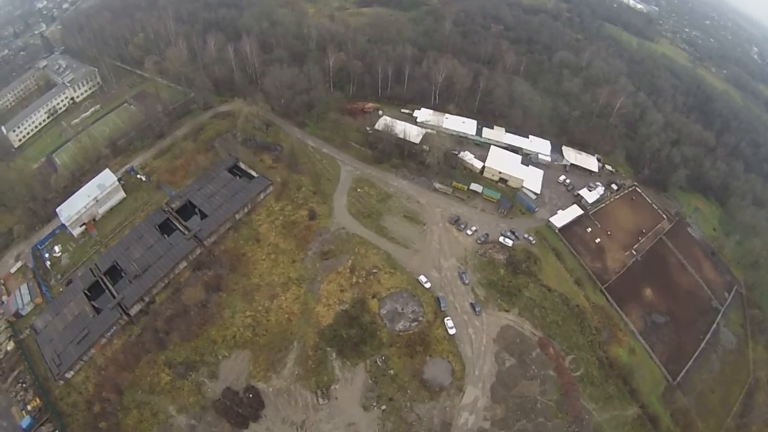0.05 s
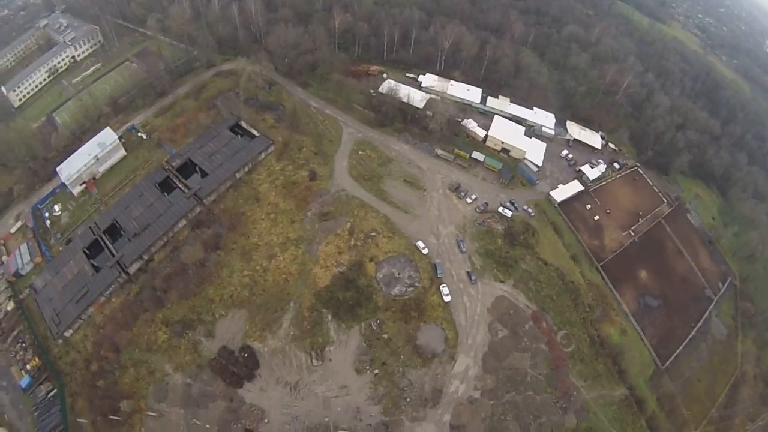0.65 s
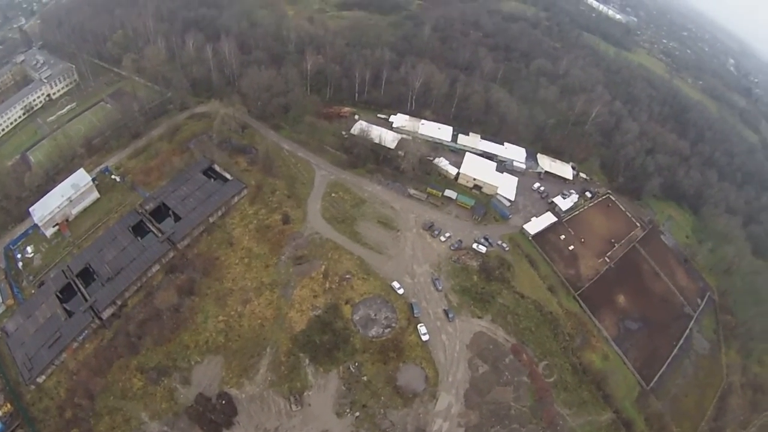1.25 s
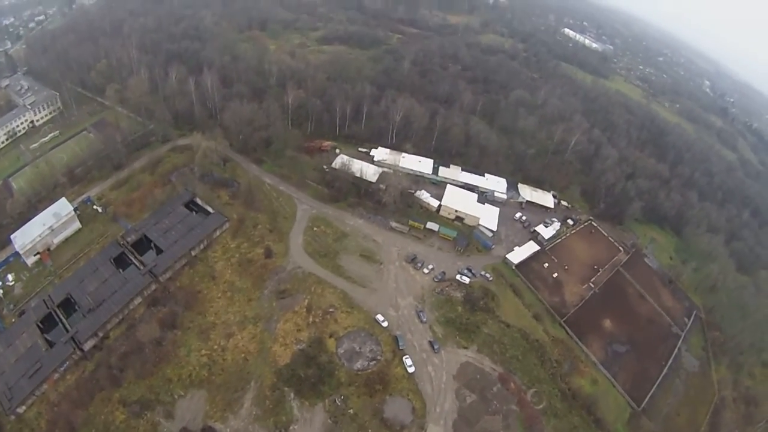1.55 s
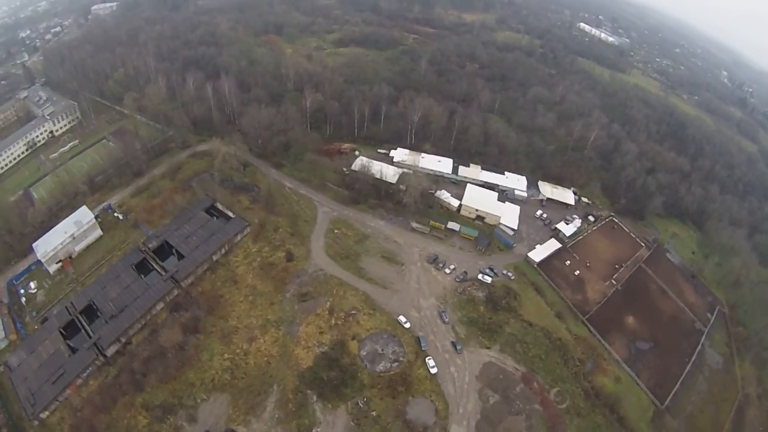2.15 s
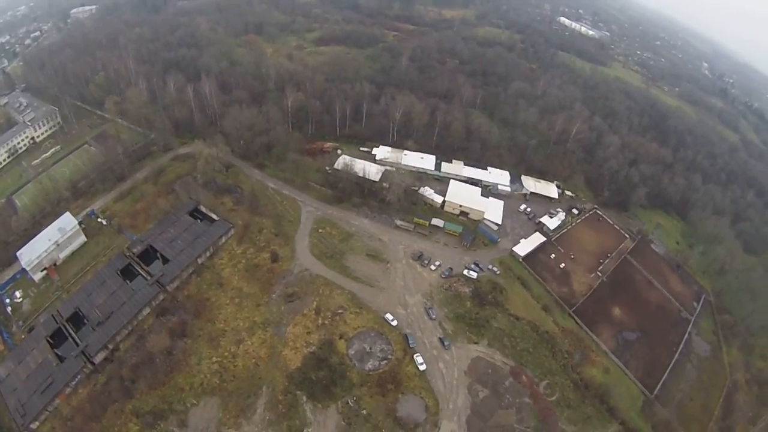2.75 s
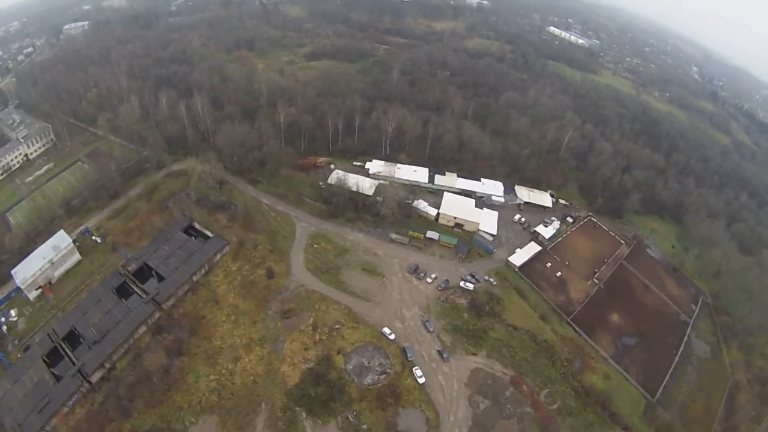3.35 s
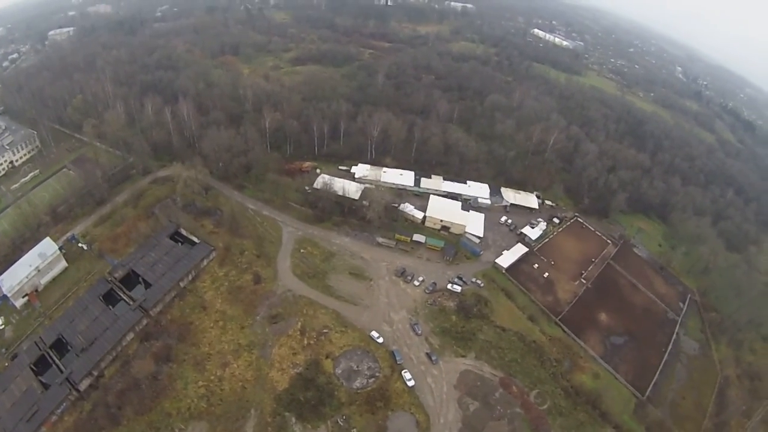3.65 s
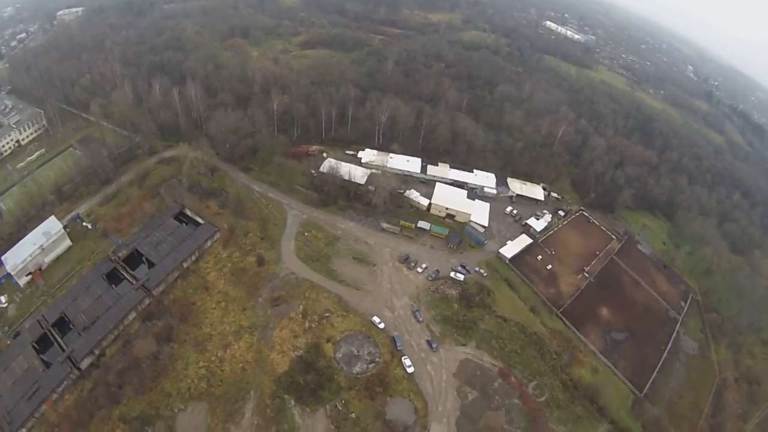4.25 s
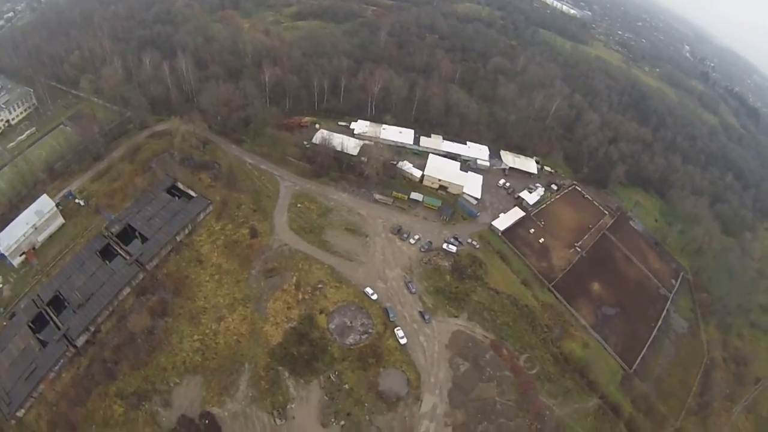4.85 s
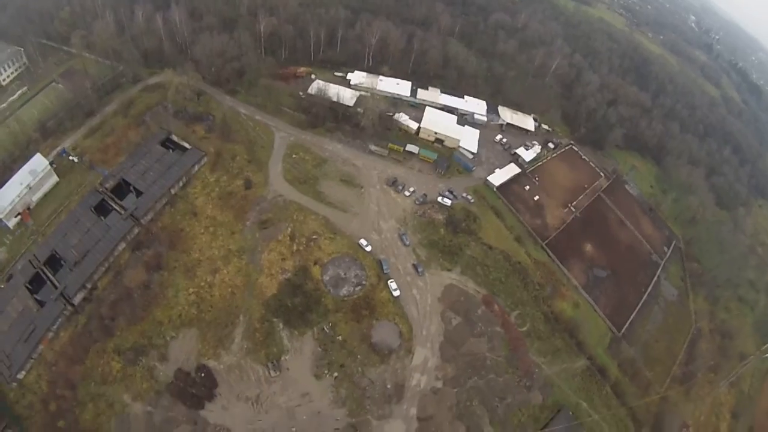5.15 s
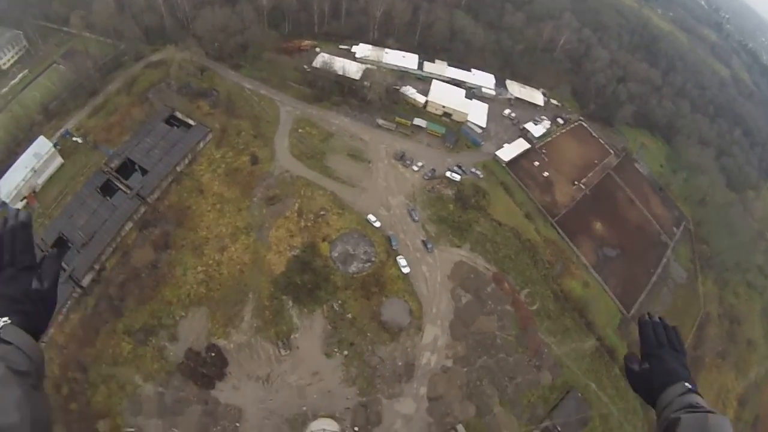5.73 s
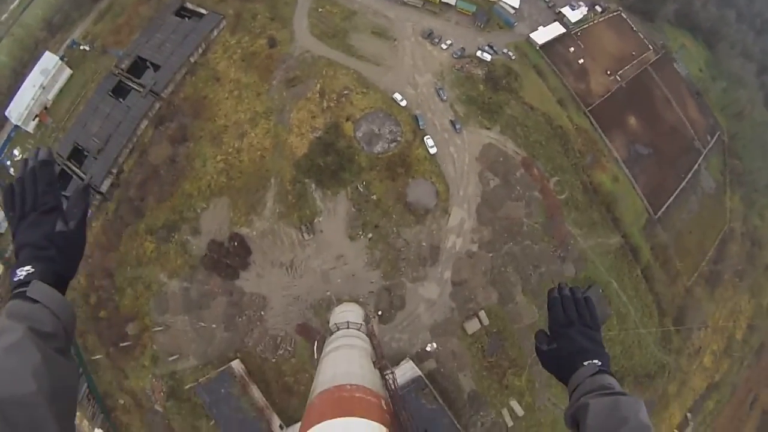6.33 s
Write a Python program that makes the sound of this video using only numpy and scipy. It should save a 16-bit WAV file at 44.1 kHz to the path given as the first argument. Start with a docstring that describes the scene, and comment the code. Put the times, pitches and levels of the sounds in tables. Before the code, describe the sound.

A rope jumper's fall is heard close up from a body-worn camera outdoors. For the first two seconds it is very quiet: faint hiss and a soft, hollow hum of air around the housing. From about 2 to 3.5 seconds small harness parts tick lightly, with a sharper click at 2.6. Meanwhile the wind grows steadily, with spells of low thumping, and is loud by 4.3 seconds, when a faint, thin whistle sounds briefly. The rush peaks with heavy buffeting between 5 and 5.3 seconds. At about 5.35 gear knocks hard on the plastic housing, the sound ducks for a moment and the wind drops away. It surges back around 5.7, then sinks and flutters unevenly over a low rumble. From 6.25 to 6.45 seconds a last gust comes with a quick cluster of sharp knocks, the hardest briefly pushing everything down again.

```python
"""A rope jumper falls from a tall chimney with a camera worn on the body.
At first slow air draws soft, hollow tones from the camera's housing. As the fall speeds up,
small gear ticks, and the air rushes ever louder, thumps in spells and whistles faintly.
Near the end the rope takes the load: the wind drops out and surges back, gear knocks
hard on the housing, and the camera's limiter briefly turns everything down."""
import sys
import numpy as np
from scipy import signal
from scipy.fft import rfft, irfft
from scipy.io import wavfile
from scipy.ndimage import uniform_filter1d, minimum_filter1d

SR = 44100
rng = np.random.default_rng(int(sys.argv[2]) if len(sys.argv) > 2 else 0)


def waveform_to_disk(signal):
    """Save audio, clipped to [-1, 1], as 16-bit WAV at the path in sys.argv[1]."""
    frames = np.transpose(np.atleast_2d(signal))
    scaled = np.clip(frames, -1, 1) * 32767
    samples = np.round(scaled).astype(np.int16)
    wavfile.write(sys.argv[1], SR, samples)


N = 286209
TIME = np.arange(N) / SR
FREQ = np.maximum(np.arange(N // 2 + 1) * SR / N, 1)

# Hollow tones of the housing. Each row: pitch in Hz, width in Hz, level in dB at a rush of 0 dB.
HOLLOW_TONES = [(560.5, 67, -28.5), (1626, 100, -21)]
# Small harness parts touching. Each row: start in seconds, peak in dB.
HARNESS_TICKS = [(2.0183, -42), (2.0232, -38), (2.0562, -47), (2.117, -45.5), (2.6032, -30), (2.6824, -37),
                 (2.6912, -35.5), (2.7420, -31.5), (2.7852, -31), (2.9592, -42), (2.9936, -40),
                 (3.0307, -37), (3.0868, -42), (3.1225, -42), (3.1622, -41), (3.2620, -31), (3.2845, -33.5),
                 (3.3317, -39), (3.4670, -34), (3.5294, -30)]
# How those parts ring. Each row: pitch in Hz, relative level in dB, seconds to fade by 60 dB.
HARNESS_TONES = [(6330, 1, 0.0061), (6800, -7, 0.0058), (7650, -4.5, 0.0022), (9400, -8, .002)]
# Air whistles. Each row: start and length in seconds, first and last pitch in Hz, level in dB.
EDGE_WHISTLES = [(2.80, 0.077, 3940, 4330, -58), (3.04, 0.039, 4560, 4300, -56),
                 (3.12, 0.034, 4550, 4140, -58), (4.26, 0.35, 4050, 4160, -36.5)]
# Gear hitting the housing. Each row: start in seconds, peak in dB, treble limit in Hz, scrape time in ms.
GEAR_KNOCKS = [(0.402, -50, 4500, 1.3), (0.6467, -46.5, 8000, 0.69), (2.0262, -30, 1390, 0.091),
               (2.6044, -15, 4500, 0.61), (5.109, -10, 1260, 0.69), (5.3232, -12, 9000, 1.05),
               (5.3534, 23, 2940, .05), (5.4109, -6, 13000, 1.3), (5.413, -23.5, 1080, 0.65),
               (6.1960, -32, 5500, 0.85), (6.2663, 1.5, 12400, 0.72), (6.3113, -10, 7860, 0.41),
               (6.3733, 20, 2600, 0.054), (6.4187, 6.5, 2060, 0.042), (6.424, -5.5, 2180, 0.092),
               (6.4369, -7.5, 3240, .5), (6.4468, -16, 3300, 0.49)]
# How its plastic shell rings. Each row: pitch in Hz, relative level in dB, seconds to fade by 60 dB.
SHELL_TONES = [(542, 5, 0.053), (900, -5, 0.011), (1605, -4, 0.015), (2166, 3, 0.015), (2520, 6.5, 0.0087),
               (3270, 11, 0.0034), (4030, -4.5, 0.0088), (4620, -18, 0.022), (5280, 13, 0.0028),
               (6000, 0, 0.0032), (7440, -3.5, 0.0046), (11300, 9, 0.0028), (13500, -9, 0.0011)]
# The wind's overall tone inside the housing. Each row: frequency in Hz, relative level in dB.
WIND_TONE = [(20, 6), (45, -11), (110, -14), (250, -9), (360, -13.5), (750, -20), (1050, -18), (1500, -6.5),
             (2250, -6), (2900, -15.5), (5000, -13), (7300, -22.5), (9800, -29.5), (15000, -29)]
# Pitches the housing and its air gap boost. Each row: centre in Hz, width in Hz, boost in dB.
HOUSING_PEAKS = [(75.6, 23, 13.5), (158, 20, 4.5), (256, 72, 2), (559, 87, 4), (892, 84, 7), (1173, 66, 5),
                 (1690, 510, 5), (3490, 340, 5), (4390, 220, 4), (5530, 150, 6), (7440, 1050, 5.5),
                 (9200, 450, 5), (11280, 1800, 9)]
# The rush of air through the fall and the swing. Each row: time in seconds, level in dB.
RUSH_LEVELS = [(0, -62), (1.55, -59.5), (1.85, -55.5), (2.35, -54.5), (2.55, -48.5), (2.92, -46),
               (3.28, -40.5), (3.41, -36), (4.1, -27), (4.3, -22), (5.0, -20), (5.28, -18.5), (5.44, -40.5),
               (5.6, -40.5), (5.67, -28), (5.87, -29), (5.98, -38.5), (6.25, -46), (6.335, -32.5),
               (6.44, -29.5), (6.49, -40.5)]
# How unsteady the air is. Each row: time in seconds, flutter depth in dB.
FLUTTER_DEPTHS = [(0, 2), (3, 0.5), (4.7, 0.56), (5.2, 2.5), (5.55, 5), (5.8, 1), (6.1, 7.5)]
# Slow, deep swings of air pressure. Each row: time in seconds, level in dB.
SWAY_LEVELS = [(0, -69), (.35, -60), (1.65, -66), (2.05, -54.5), (3.2, -41.5), (4.0, -54), (4.7, -59),
               (5.3, -32), (5.78, -58), (6.1, -36), (6.49, -45)]
# Spells of big swirls hitting the housing. Each row: start and length in seconds, strength in dB.
BUFFET_SPELLS = [(1.98, 0.16, -54.5), (2.415, 0.4, -48), (3.226, 0.26, -44), (4.308, 0.11, -38),
                 (4.997, 0.022, -22), (5.057, .03, -22.5), (5.124, 0.043, -15), (5.2, 0.17, -19),
                 (5.546, 0.14, -34.5), (5.868, 0.463, -33.5)]
# Moments when the air breaks away from the housing. Each row: start and length in seconds, drop in dB.
WIND_LULLS = [(4.876, 0.51, 6), (5.194, 0.015, 9.5), (5.273, 0.016, 15), (5.434, 0.064, 22),
              (5.627, 0.0084, 14), (6.08, 0.0092, 4), (6.129, 0.032, 16)]


def undb(db):
    """Turn decibels into a number to multiply a sound by."""
    return 10 ** (np.asarray(db) / 20)


def curve(table):
    """Join a table's points with straight lines, giving one value per sample."""
    return np.interp(TIME, *np.transpose(table))


def wobble(per_second):
    """A smooth random wobble with a typical size of 1."""
    hold = max(int(SR / per_second), 1)
    steps = rng.standard_normal(N)[np.arange(N) // hold]
    smooth = uniform_filter1d(uniform_filter1d(steps, hold), hold)
    return smooth / smooth.std()


def swell(start, length, rise_s, fall_s):
    """Rise to 1 by the start, hold for the length, then fade to 0."""
    return np.interp(TIME - start, [-rise_s, 0, length, length + fall_s], [0, 1, 1, 0])


def shaped_noise(gains):
    """Noise with a typical size of 1, weighted by one gain per frequency."""
    noise = irfft(rfft(rng.standard_normal(N)) * gains, N)
    return noise / noise.std()


def ring(tones, t, detune=1):
    """A struck object rings with several fading tones at once."""
    return sum(undb(db) * np.sin(2 * np.pi * hz * detune * t) * np.exp(-np.log(1000) * t / fade_s)
               for hz, db, fade_s in tones)


def add(out, start, sound, peak_db):
    """Mix in a short sound at the given peak level."""
    i = int(start * SR)
    out[i:i + len(sound)] += (sound * undb(peak_db) / np.abs(sound).max())[:N - i]


def microphone_hiss(level_db=-65.5):
    """The microphone makes a faint, even hiss of its own."""
    return undb(level_db) * rng.standard_normal(N)


def hollow_tones(growth=0.72):
    """The housing hums in slow air; the rush grows faster and drowns it out."""
    rush_db = curve(RUSH_LEVELS)
    out = 0
    for hz, width, db in HOLLOW_TONES:
        hum = shaped_noise(1 / (1 + (2 * (FREQ - hz) / width) ** 2))
        out = out + hum * undb(db + growth * rush_db)
    return out


def harness_ticks(pitch_spread=0.016):
    """Hard parts too small to give off bass touch, each time at a slightly different pitch."""
    out, t = np.zeros(N), np.arange(600) / SR
    treble_only = signal.butter(3, [5200, 10000], "band", fs=SR, output="sos")
    for start, db in HARNESS_TICKS:
        tick = ring(HARNESS_TONES, t, detune=1 + pitch_spread * rng.standard_normal())
        add(out, start, signal.sosfilt(treble_only, tick), db)
    return out


def edge_whistles(waver=0.0082, flicker_db=4.0):
    """Air passing an edge makes a thin, gliding tone that shakes in pitch and loudness."""
    shake = 1 + waver * wobble(350)
    flicker = undb(flicker_db * wobble(90))
    out = 0
    for start, length, first_hz, last_hz, db in EDGE_WHISTLES:
        # the glide carries on into the fades
        hz = first_hz + (last_hz - first_hz) * np.clip((TIME - start) / length, -1, 2)
        tone = np.sin(2 * np.pi * np.cumsum(hz * shake) / SR)
        out = out + tone * undb(db) * swell(start, length, rise_s=0.022, fall_s=0.04)
    return out * flicker


def gear_knocks(bass_cut_hz=1650, samples=3000):
    """Each hit is a push and a short scrape that ring the shell; softer contact sounds duller."""
    out, t = np.zeros(N), np.arange(samples) / SR
    shell = ring(SHELL_TONES, t)
    for start, db, treble_hz, scrape_ms in GEAR_KNOCKS:
        age = t * 1000 / scrape_ms
        force = scrape_ms * rng.standard_normal(samples) * age * np.exp(-age * 1.12)
        force[0] += 1  # the push
        knock = signal.fftconvolve(force, shell)[:samples]
        cut_treble = signal.butter(3, treble_hz, fs=SR, output="sos")
        # so small a shell gives little bass, unless a soft bump shakes the whole camera
        cut_bass = signal.butter(3, min(bass_cut_hz, 0.83 * treble_hz), "high", fs=SR, output="sos")
        add(out, start, signal.sosfilt(np.vstack([cut_treble, cut_bass]), knock), db)
    return out


def housing():
    """How strongly the housing passes each frequency: a broad shape with peaks where it rings."""
    hz, db = np.transpose(WIND_TONE)
    gain_db = np.interp(np.log(FREQ), np.log(hz), db)
    for centre, width, boost in HOUSING_PEAKS:
        gain_db += boost / (1 + (2 * (FREQ - centre) / width) ** 2)
    return undb(gain_db)


def swirls(low_hz, high_hz):
    """Swirling air heard through the housing as a band of noise; bigger swirls sound lower."""
    band = 1 / np.sqrt((1 + (low_hz / FREQ) ** 8) * (1 + (FREQ / high_hz) ** 8))
    return shaped_noise(housing() * band)


def buffeting(flow_db, full_speed_db=-32.5, growth=0.69):
    """The strength of big swirls in dB: it grows more slowly than the rush, with rough spells on top."""
    power = undb(full_speed_db + growth * flow_db) ** 2
    for start, length, db in BUFFET_SPELLS:
        power += (undb(db) * swell(start, length, rise_s=0.015, fall_s=0.047)) ** 2
    return 10 * np.log10(power)


def lulls():
    """How many dB the hiss drops while the air breaks away from the housing."""
    return sum(db * swell(start, length, rise_s=0.0052, fall_s=0.0025)
               for start, length, db in WIND_LULLS)


def wind(full_rush_db=-20.5, hiss_growth=1.24, sizzle_growth=1.56):
    """Big swirls thump the housing; small ones rush and hiss, fluttering together as they break away."""
    rush_db = curve(RUSH_LEVELS)
    flow_db = rush_db - full_rush_db  # 0 at full speed
    depth_db = curve(FLUTTER_DEPTHS)
    flutter_db = depth_db * (0.65 * wobble(45) + 0.46 * wobble(260))
    crackle_db = depth_db * 0.61 * wobble(1100)
    buffet_db, lull_db = buffeting(flow_db), lulls()
    sway = swirls(6.5, 44.5) * undb(curve(SWAY_LEVELS) + 1.3 * wobble(9))
    boom = swirls(58, 121.5) * undb(buffet_db - 1.5)
    # mid-sized swirls follow both the buffeting and the rush
    rumble = swirls(165, 267) * undb(0.68 * buffet_db + 0.29 * rush_db - 10 + 0.57 * wobble(30))
    roar = swirls(362, 1040) * undb(0.33 * buffet_db + 0.57 * rush_db - 12 + 0.31 * flutter_db)
    rush = swirls(1020, 2960) * undb(rush_db - 0.28 + flutter_db - 0.35 * lull_db)
    # the smallest swirls grow faster than the rush, and unsteady air sizzles more
    flicker_db = flutter_db + crackle_db - lull_db
    hiss = swirls(2650, 9700) * undb(-31 + hiss_growth * flow_db + flicker_db)
    sizzle = swirls(7300, 14600) * undb(-42.5 + sizzle_growth * flow_db + 1.1 * depth_db + flicker_db)
    return sway + boom + rumble + roar + rush + hiss + sizzle


def scene():
    """Mix the air and the gear over the microphone's hiss, in one channel."""
    mix = microphone_hiss() + wind() + hollow_tones() + edge_whistles() + gear_knocks() + harness_ticks()
    return mix[None]


def limiter(sound, ceiling_db=7, ahead_s=0.0147, recover_db_per_s=105):
    """Turn the volume down just before a peak passes the ceiling, then steadily back up."""
    needed_db = np.minimum(ceiling_db - 20 * np.log10(np.abs(sound) + 1e-9), 0)
    ahead = int(ahead_s * SR)
    needed_db = minimum_filter1d(needed_db, ahead, origin=-(ahead // 2))
    climb_db = recover_db_per_s * TIME
    gain_db = np.minimum.accumulate(needed_db - climb_db) + climb_db
    return sound * undb(uniform_filter1d(gain_db, size=64))


def record(dry, top_hz=15250):
    """The camera limits the sound, clips what is still too loud and cuts the highest treble."""
    clipped = np.clip(limiter(dry[0]), -0.95, 0.95)
    cut_treble = signal.ellip(10, 0.1, 90, top_hz, fs=SR, output="sos")
    return signal.sosfilt(cut_treble, clipped)[None]


dry = scene()
out = record(dry)
waveform_to_disk(out)
```